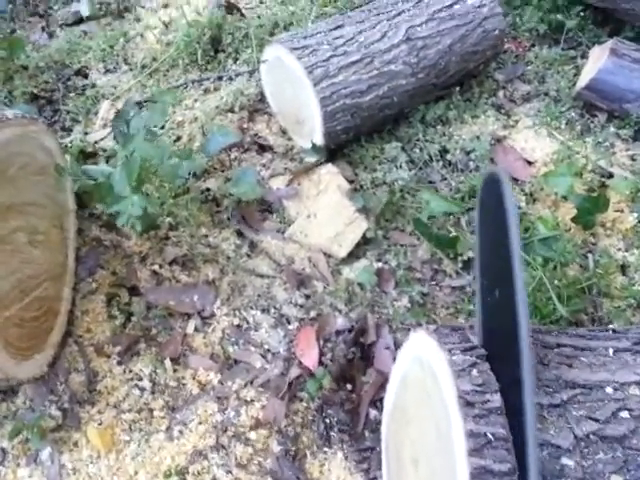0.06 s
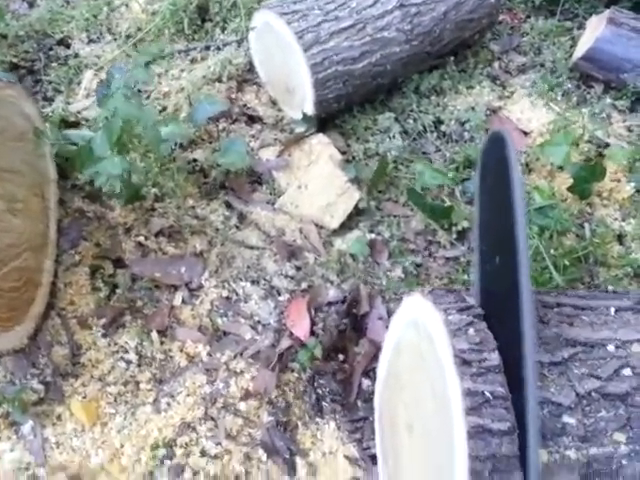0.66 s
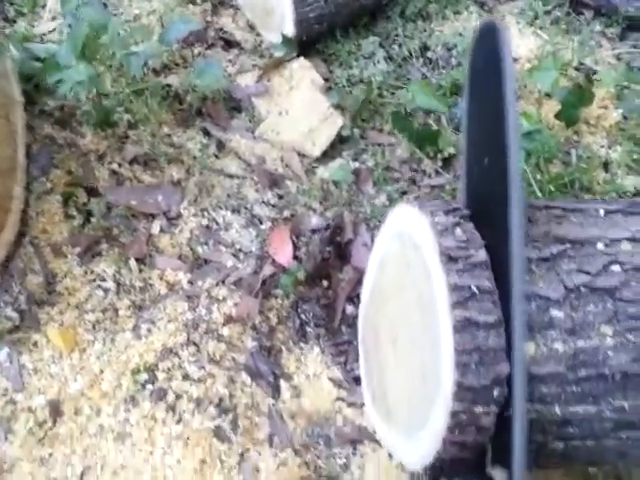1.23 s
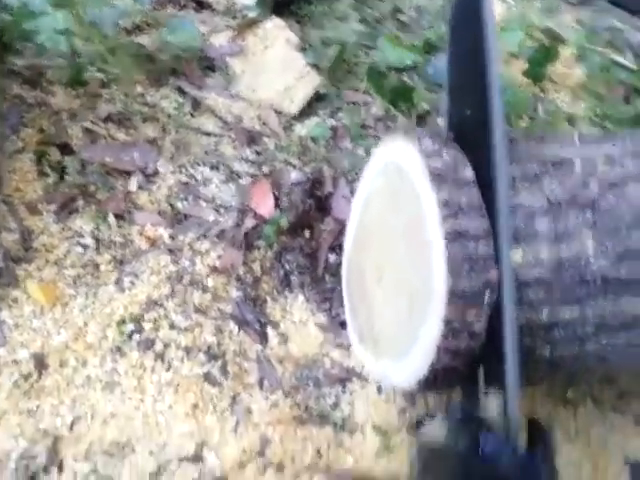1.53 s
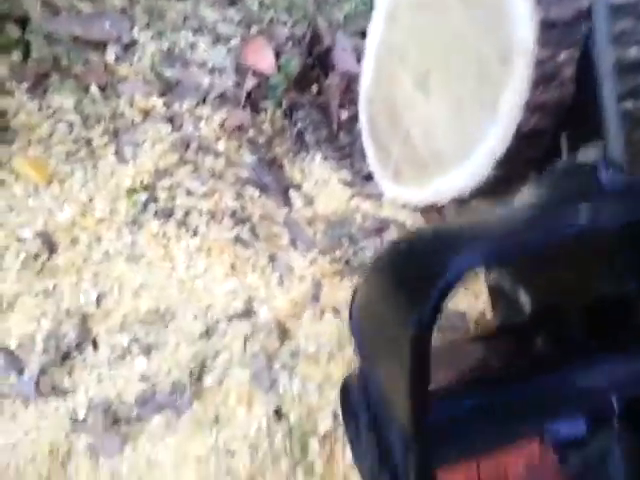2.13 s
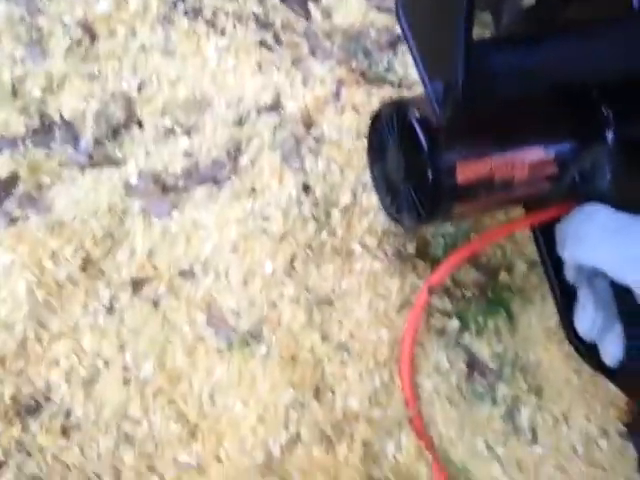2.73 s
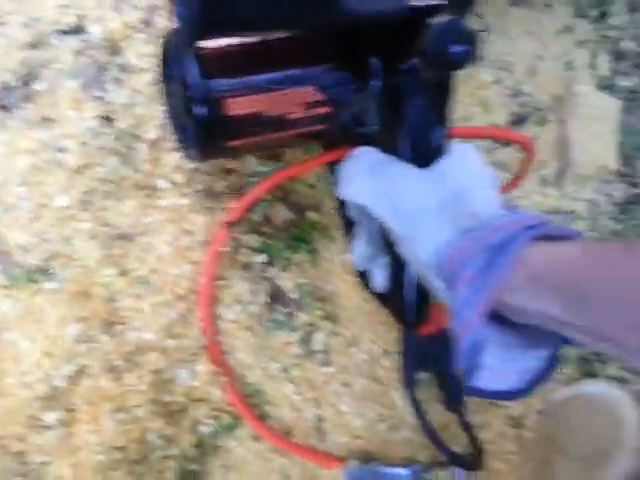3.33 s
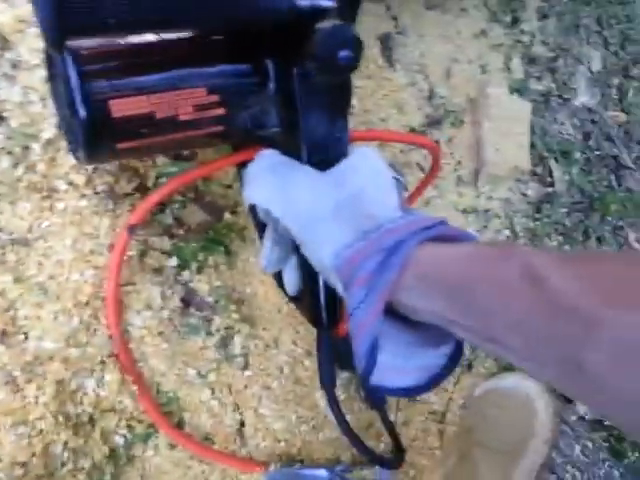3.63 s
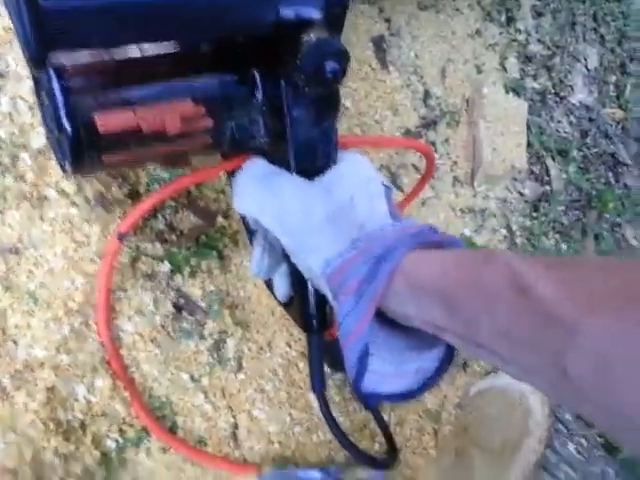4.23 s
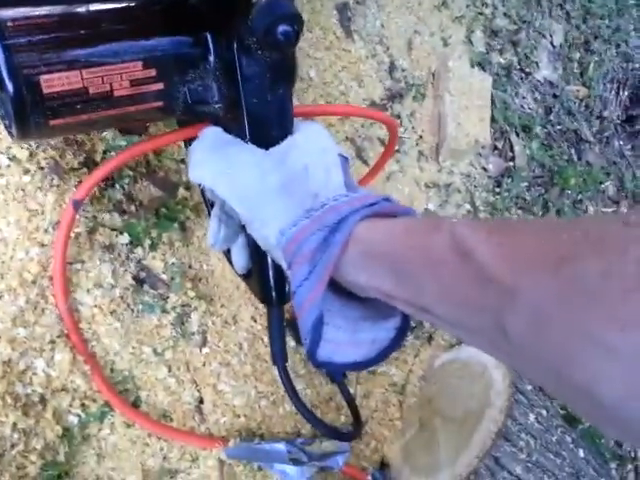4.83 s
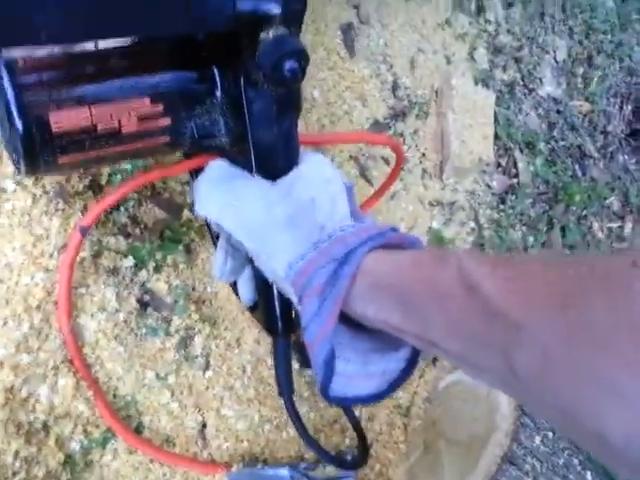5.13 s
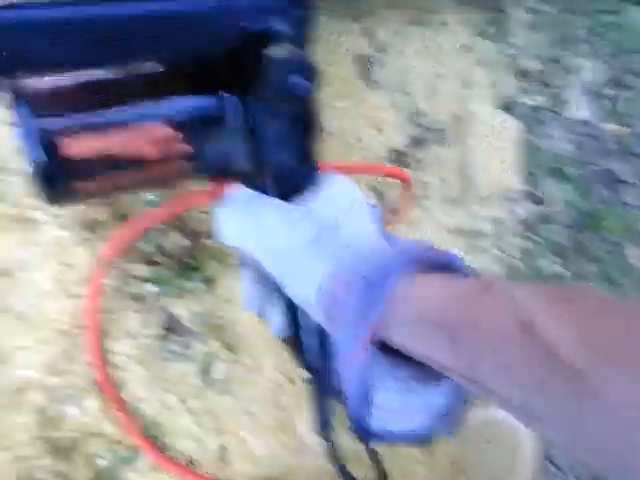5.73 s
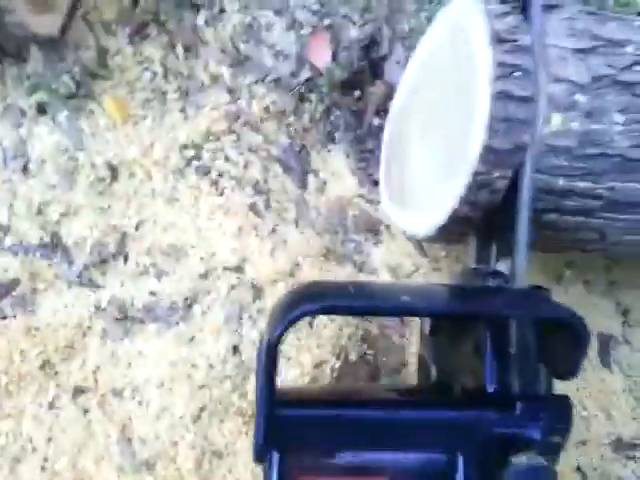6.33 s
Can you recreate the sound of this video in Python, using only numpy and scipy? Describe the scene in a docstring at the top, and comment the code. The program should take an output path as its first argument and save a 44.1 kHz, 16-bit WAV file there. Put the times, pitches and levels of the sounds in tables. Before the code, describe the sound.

A corded electric chainsaw is already running at full speed, very close, in a yard, and keeps going for about six and a half seconds without cutting. It makes a loud, high, steady whine with rushing, whistling fan air, whining gears and a metallic chain rattle. The pitch wavers only slightly. At first the microphone is near the bar, so the rattle and sizzle of the chain are clear. A faint puff of air flutters on the microphone in the first second. The gears swell to a brief screech around 1.5 seconds. From about 3 seconds the microphone moves to the motor: the rattle fades and the rush of the vents stands out, with another gear swell near 4.5 seconds. Around 6 seconds the pitch lifts a little and the chain rattle returns. Soft low bumps lie underneath throughout.

```python
"""A loud, steady whine and rush: a corded electric chainsaw running free at full speed, very close, in a yard.
At about 375 rev/s the rotor hums, the cooling fan whistles and rushes, the pinion whines against the
drive wheel and the chain rattles round the bar. The microphone moves from bar (place 0) to motor
(place 1) and back, which sets the mix. Soft low bumps and one puff of air lie underneath."""
import sys
import numpy as np
from scipy import signal
from scipy.io import wavfile
from scipy.ndimage import uniform_filter1d, minimum_filter1d, map_coordinates

SR = 44100
rng = np.random.default_rng(int(sys.argv[2]) if len(sys.argv) > 2 else 0)


def int16_out(signal):
    """Quantize to a 16-bit WAV file."""
    q = np.round(np.clip(np.atleast_2d(signal).T, -1, 1) * 32767)
    wavfile.write(sys.argv[1], SR, q.astype(np.int16))


N = 285327
WHEEL_RATIO = .187  # drive wheel turns per motor turn


def from_db(db):
    return 10 ** (np.asarray(db) / 20)


def rms_one(x):
    return x / np.sqrt(np.mean(x ** 2) + 1e-20)


def lookup(rows, x, axis=np.asarray):
    """Table columns at x, interpolated along the first column."""
    keys, *columns = np.transpose(rows)
    return [np.interp(axis(x), axis(keys), column) for column in columns]


def blend(place, at_bar, at_motor):
    return at_bar + place * (at_motor - at_bar)


def drift(rate_hz):
    """Smooth random curve, rms 1."""
    r = np.exp(-40 * np.pi * rate_hz / SR)
    slow = signal.lfilter([1], [1, -2 * r, r * r], rng.standard_normal(N // 20 + 3002))[3000:]
    return np.interp(np.arange(N) / 20, np.arange(len(slow)), rms_one(slow))


def swell(peak_s, half_s):
    return np.exp(-((np.arange(N) / SR - peak_s) / half_s) ** 2)


def pan(balance_db):
    """Constant-power stereo gains; positive is left."""
    ratio = np.atleast_1d(from_db(balance_db))
    return np.array([ratio, np.ones_like(ratio)]) * np.sqrt(2 / (1 + ratio ** 2))


def bandpass(x, low_hz, high_hz, order=2):
    return signal.sosfilt(signal.butter(order, [low_hz, high_hz], "band", fs=SR, output="sos"), x)


def resonance(x, hz, width_hz, passes=1):
    """Two-pole band-pass, peak gain 1; each further pass narrows it."""
    r = np.exp(-np.pi * width_hz / SR)
    poles = [1, -2 * r * np.cos(2 * np.pi * hz / SR), r * r]
    for _ in range(passes):
        x = signal.lfilter(np.array([1, 0, -1]) * (1 - r * r) / 2, poles, x)
    return x


def knocks(cycles, scatter_db):
    """One click of random strength per cycle."""
    clicks = np.diff(np.floor(cycles), prepend=np.floor(cycles[0]))
    return clicks * from_db(scatter_db * rng.standard_normal(N))


def tone(turns, order, fade_db, wander_rad):
    """Motor order; log and ground reflections shift level and phase per channel as the saw moves."""
    phase = 2 * np.pi * (order * turns + rng.random())
    channels = [from_db(fade_db * drift(3.5)) * np.sin(phase + wander_rad * drift(0.85))
                for _ in range(2)]
    return np.sqrt(2) * np.array(channels)


def motor(turns, place, octave_db, fan_db, fan_blades=10):
    """Rotor hum at twice shaft speed, its octave throbbing with the drive wheel, blade-rate whistle."""
    # weaker tones: multiple of shaft speed
    orders = [1, 3, 6, 8, 12, 14, 20, 22, 23]
    # per order: bar_db, motor_db, bar_pan_db, motor_pan_db
    overtones = [(-28, -32, 0.5, 2), (-32, -39, -4, -6), (-30, -28, -6, -11), (-32.5, -23, 6, -11),
                 (-30.5, -37, 1, -2), (-46, -47, -2, -2), (-37, -38, -4, -5), (-42, -47, -2, -2),
                 (-49, -55, -2, -2)]
    throb_db = 3.5 * (np.sin(2 * np.pi * WHEEL_RATIO * turns) + drift(27))
    hum = tone(turns, 2, fade_db=.15, wander_rad=.04)
    snarl_turns = 0.0077 * drift(60)
    octave = rms_one(from_db(throb_db)) * tone(turns + snarl_turns, 4, fade_db=-1.0, wander_rad=0.24)
    whistle = tone(turns, fan_blades, fade_db=1.0, wander_rad=0.15)
    out = from_db(-14.5 - 1.7 * place) * hum * pan(-1.8 + place)
    out += from_db(octave_db) * octave * pan(-5.0)
    out += from_db(fan_db) * whistle * pan(6.8 + 3 * place)
    for order, (bar_db, motor_db, bar_pan_db, motor_pan_db) in zip(orders, overtones):
        overtone = tone(turns, order, fade_db=min(.6 * order, 1.5), wander_rad=.08 * order)
        level = from_db(blend(place, bar_db, motor_db))
        out += level * overtone * pan(blend(place, bar_pan_db, motor_pan_db))
    return out


def rush(turns, place):
    """Cooling air and sliding chain: broad noise whose treble throbs with the drive wheel."""
    # noise density: freq_hz, bar_db_per_hz, motor_db_per_hz, bar_pan_db, motor_pan_db
    spectrum = [(40.0, -89, -69.5, 20, -56), (144, -73, -69, 1, 6), (327, -54.5, -56.5, 3, -4.5),
                (700, -48, -47.5, -3.5, -3.5), (1150, -45, -47.5, -5.5, -5),
                (1390, -42.5, -44.5, -15.5, -3), (2260, -48, -41, -4, -20), (3440, -53.5, -48.5, 11, -22),
                (4470, -52.5, -54, -5.5, 15), (6200, -56.5, -53.5, -3.5, -23), (8300, -57, -60, -0.7, -5.2),
                (11200.0, -57.5, -63.5, -7.5, -6.5), (13000.0, -62.5, -73, -2, -11),
                (14400.0, -67, -74, -1.5, -5.4)]
    # left-right correlation: freq_hz, at_bar, at_motor
    correlation = [(100, .1, .1), (280, .92, .85), (650, .92, .85), (1350, .75, .6), (2900, .2, .45),
                   (6000, 0, 0), (14000, 0, 0)]
    edges_hz = np.geomspace(25, 15000, 27)
    white = np.sqrt(SR / 2) * rng.standard_normal((2, 2, N))
    throb_db = 1.43 * np.sin(2 * np.pi * WHEEL_RATIO * turns) + 0.88 * drift(23)
    out = 0
    for k, (low_hz, high_hz) in enumerate(zip(edges_hz, edges_hz[1:])):
        hz = np.sqrt(low_hz * high_hz)
        mid, side = bandpass(white[k % 2], low_hz, high_hz, order=3)
        alike = blend(place, *lookup(correlation, hz, axis=np.log))
        band = np.sqrt((1 + alike) / 2) * mid + np.sqrt((1 - alike) / 2) * side * [[1], [-1]]
        bar_db, motor_db, bar_pan_db, motor_pan_db = lookup(spectrum, hz, axis=np.log)
        uneven_db = 0.69 * drift(7.6) + throb_db * min(hz / 4000, 1)
        level = from_db(blend(place, bar_db, motor_db) + uneven_db)
        out += level * band * pan(blend(place, bar_pan_db, motor_pan_db))
    return out


def gear_whine(turns, gear_db, pinion_teeth=11):
    """The mesh swells once per wheel turn and beats twice per turn as the teeth cross their backlash."""
    wheel_turns = WHEEL_RATIO * turns
    swell_db = 2.0 * np.sin(2 * np.pi * wheel_turns)
    beat_db = 9.5 * np.sin(4 * np.pi * wheel_turns + 3.2 * drift(29))
    load = np.clip((gear_db + 36) / 11, .3, 1)  # a harder mesh chatters more
    force = from_db(load * (swell_db + beat_db + 1.5 * drift(110)))
    force /= np.sqrt(uniform_filter1d(force ** 2, size=8000))
    whine = tone(turns, pinion_teeth, fade_db=.3, wander_rad=.2)
    return from_db(gear_db + 1.5) * force * whine * pan(1.4)


def tooth_clash(turns, gear_db):
    """Gear teeth clash once per wheel turn, again on the rebound, and ring briefly."""
    wheel_turns = WHEEL_RATIO * turns + .12 * drift(60)
    accent = from_db(3.8 * np.cos(2 * np.pi * wheel_turns))
    clashes = accent * knocks(2 * wheel_turns, scatter_db=7.5)
    ring = resonance(clashes, hz=4090, width_hz=240, passes=2)
    return from_db(gear_db - 3) * rms_one(ring) * pan(2.3)


def chain_rattle(turns, rattle_db, sprocket_teeth=6, contact_hz=4560):
    """Links land on the sprocket and ring the bar, harder as the slack chain whips; oil dulls the hits."""
    # bar and chain modes: freq_hz, width_hz, relative_db
    bar_modes = [(1140, 50, -1.5), (1456, 37, 1.5), (1600, 71, 1.5), (2100, 140, 1), (2680, 130, -5)]
    wheel_turns = WHEEL_RATIO * turns
    links = sprocket_teeth * wheel_turns + .2 * drift(150)
    whip = from_db(3.0 * (drift(13) + np.sin(2 * np.pi * wheel_turns)))
    rings = 0
    for hz, width_hz, relative_db in bar_modes:
        landings = whip * knocks(links, scatter_db=4.5)
        rings += from_db(relative_db) * rms_one(resonance(landings, hz, width_hz))
    oiled = signal.sosfilt(signal.butter(2, contact_hz, fs=SR, output="sos"), rings)
    return from_db(rattle_db) * rms_one(oiled) * pan(-8.0)


def housing(turns, place, level_db, rasp_db=5.0, focus_db=4.5):
    """Rotor-chopped air sounds the vent cavities; near the motor the higher ones face the microphone."""
    # cavity modes: freq_hz, nominal_width_hz, relative_db
    cavities = [(1790, 72, 1.5), (2113, 92, -9), (2226, 92, 1.5), (2720, 190, 3.5), (3008, 35, -3.5),
                (5190, 370, -2)]
    air = rng.standard_normal((2, N)) * from_db(rasp_db * np.sin(2 * np.pi * turns))
    facing_hz = 1500 + 1300 * place
    out = 0
    for hz, nominal_width_hz, relative_db in cavities:
        facing = np.exp(-(np.log(hz / facing_hz) / 0.12) ** 2)
        cavity = rms_one(resonance(air, hz, 1.26 * nominal_width_hz, passes=2))
        out += from_db(relative_db + focus_db * facing) * cavity
    return from_db(level_db) * rms_one(out) * pan(-6.5)


def link_sizzle(turns, place, throb_db=0.5):
    """Links sliding in the groove excite high steel modes, in time with the drive wheel."""
    # steel modes: freq_hz, pass_width_hz, bar_db, motor_db
    steel_modes = [(4700, 240, -26, -39), (7620, 720, -33.5, -29.5), (10930, 850, -27, -52),
                   (12300, 900, -42, -33)]
    rub = rng.standard_normal((2, N)) * from_db(throb_db * np.sin(2 * np.pi * WHEEL_RATIO * turns))
    out = 0
    for hz, width_hz, bar_db, motor_db in steel_modes:
        ring = rms_one(resonance(rub, hz, width_hz, passes=2))
        out += from_db(blend(place, bar_db, motor_db)) * ring
    return out * pan(-2.0)


def low_bumps(length_s=0.053, rumble_db=-53.5):
    """Soft bumps over a faint, lumpy rumble, mostly on the right."""
    # bumps: start_s, nominal_db
    bumps = [(0.069, -45), (0.538, -32), (1.074, -45), (1.482, -47), (1.708, -38), (2.205, -37),
             (2.356, -40), (2.948, -34), (3.037, -43), (3.31, -42), (3.428, -38), (3.611, -40),
             (3.761, -40), (3.954, -37), (4.176, -44), (4.658, -37), (5.196, -36), (5.343, -32),
             (6.152, -44)]
    level = from_db(rumble_db + 5 * drift(5.9))
    for start_s, nominal_db in bumps:
        progress = np.clip((np.arange(N) / SR - start_s) / length_s, 0, 1)
        level += from_db(nominal_db + 0.5) * np.sin(np.pi * progress) ** 2
    rumble = bandpass(rng.standard_normal((2, N)), low_hz=30, high_hz=170)
    return level * rms_one(rumble) * pan(-16.0)


def gust(level_db=-37, flutter_db=4):
    """A puff of air flutters on the microphone ports."""
    air = bandpass(rng.standard_normal((2, N)), low_hz=80, high_hz=174)
    flutter = rms_one(air * from_db(flutter_db * drift(16)))
    return from_db(level_db) * swell(peak_s=0.34, half_s=0.37) * flutter * pan(-7.0)


def scene():
    """One shaft drives every part of the saw; microphone place sets the mix and the left-channel lag."""
    # motor speed: time_s, speed_rps
    speed_curve = [(0.0, 367.0), (0.11, 379.7), (0.27, 373.9), (0.99, 362.4), (1.22, 365.9), (1.55, 373.1),
                   (1.69, 370.7), (1.93, 383.5), (2.29, 381.9), (2.7, 370.4), (3.04, 375.3), (3.42, 370.3),
                   (3.62, 378.4), (4.03, 382.5), (4.38, 380.7), (4.42, 382.3), (4.65, 381.4), (5.01, 372.1),
                   (5.21, 373.4), (5.57, 371.8), (6.05, 391.4), (6.47, 391.9)]
    # microphone path: time_s, place
    path = [(0, 0.078), (1.5, 0.11), (2.35, 0.035), (2.9, 0.35), (3.3, 0.47), (3.7, 0.77), (5.0, 0.9),
            (5.8, 0.91), (6.0, 0.73), (6.2, 0.14), (6.47, .17)]
    # mix along the saw: place, octave_db, gear_db, rattle_db, housing_db, left_lag_s
    mix = [(0, -20.5, -22, -10.5, -22, -.00007), (.25, -17.5, -28, -20.5, -22, -.00005),
           (.45, -25.5, -24.5, -13, -12, .00005), (.75, -29, -29, -23.5, -14.5, .00014),
           (1, -36, -35, -48, -18, .0002)]
    # gear whine swelling to a screech: peak_s, half_s, rise_db
    screeches = [(.55, .45, 2), (1.5, 0.27, 8), (3.1, .15, 2.5), (4.5, .12, 8), (6.3, 0.13, 4.5)]
    samples = np.arange(N)
    speed_rps, = lookup(speed_curve, samples / SR)
    place, = lookup(path, samples / SR)
    octave_db, gear_db, rattle_db, housing_db, left_lag_s = lookup(mix, place)
    gear_db += sum(rise_db * swell(peak_s, half_s) for peak_s, half_s, rise_db in screeches)
    rattle_db += 0.06 * (speed_rps - speed_rps.mean())
    fan_db = np.minimum(-26 + .6 * (speed_rps - 375), -19.5)
    chain_drag = .0019 * drift(30)
    turns = np.cumsum(speed_rps * (1 + chain_drag)) / SR
    saw = motor(turns, place, octave_db, fan_db)
    saw += gear_whine(turns, gear_db) + tooth_clash(turns, gear_db)
    saw += chain_rattle(turns, rattle_db) + link_sizzle(turns, place)
    saw += housing(turns, place, housing_db) + rush(turns, place)
    left = map_coordinates(saw[0], [samples - left_lag_s * SR], order=3, mode="mirror")
    return np.array([left, saw[1]])


def record(dry):
    """Fast limiter and low cut on the saw; bumps and gust join before the high cut."""
    ceiling, low_cut_hz, high_cut_hz = .95, 180, 14500
    gain = np.minimum(1, ceiling / (np.abs(dry) + 1e-9))
    gain = uniform_filter1d(minimum_filter1d(gain, size=25, axis=1), size=25, axis=1)
    saw = signal.sosfiltfilt(signal.butter(3, low_cut_hz, "high", fs=SR, output="sos"), gain * dry)
    out = saw + low_bumps() + gust()
    return signal.sosfilt(signal.ellip(12, .1, 70, high_cut_hz, fs=SR, output="sos"), out)


dry = scene()
out = record(dry)
int16_out(out)
```